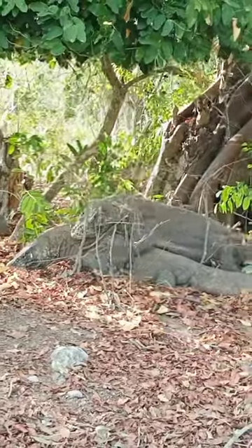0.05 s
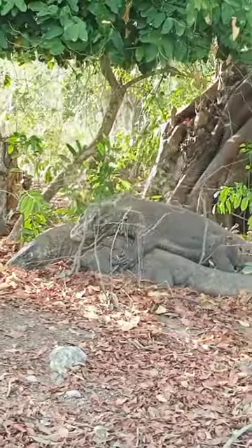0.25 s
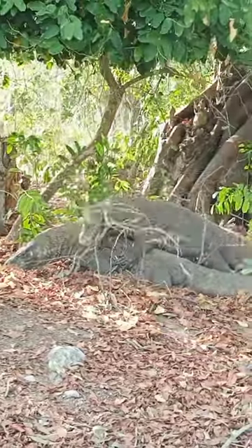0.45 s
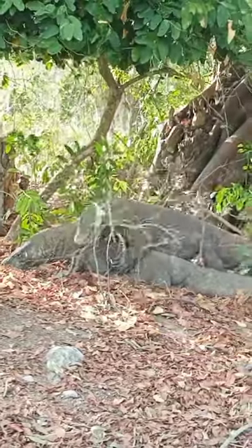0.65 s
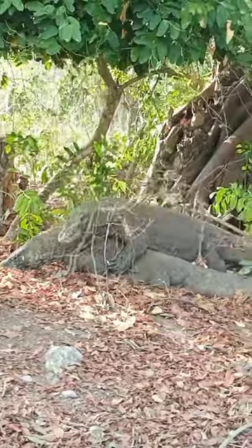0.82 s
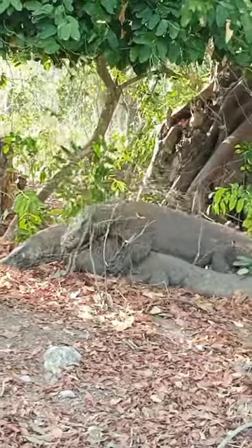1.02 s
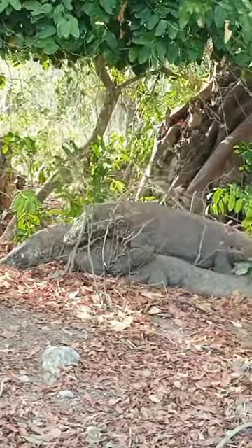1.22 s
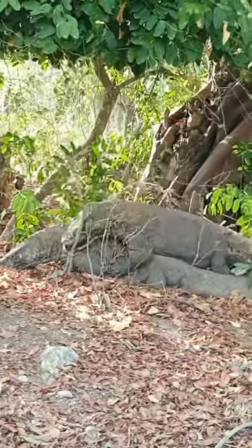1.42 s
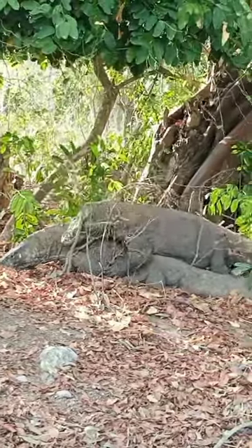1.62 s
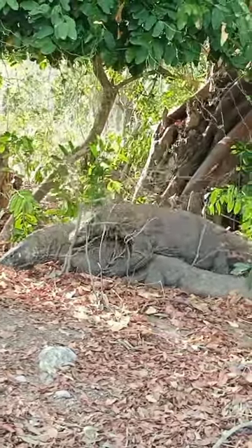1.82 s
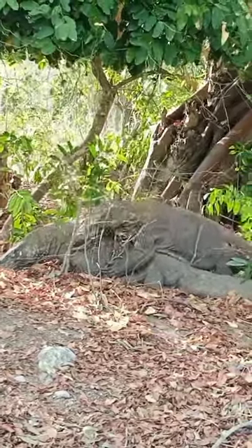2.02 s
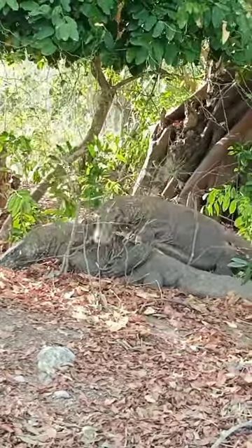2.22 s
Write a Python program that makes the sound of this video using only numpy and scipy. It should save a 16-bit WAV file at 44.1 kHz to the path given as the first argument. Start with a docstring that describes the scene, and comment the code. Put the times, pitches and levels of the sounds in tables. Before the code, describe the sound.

Large lizards drag over crackling dry leaves and twigs, with a faint engine chugging far off.

```python
"""Dry leaves rustle and crunch a few metres away, with sharp snaps and one dull thump.
Two large lizards are wrestling under trees: their bodies drag over the leaves and crush them,
twigs break and one body lands on the soil. Far off, a one-cylinder engine chugs, puffing
twenty times a second, and a few faint whistles, probably birds, pass over a soft outdoor hush."""
import sys
import numpy as np
from scipy import signal
from scipy.fft import rfft, irfft
from scipy.io import wavfile
from scipy.ndimage import uniform_filter1d

SR = 44100
rng = np.random.default_rng(int(sys.argv[2]) if len(sys.argv) > 2 else 0)


def to_wav(s):
    """Save 16-bit WAV."""
    ch = np.atleast_2d(s).T  # columns
    pcm = np.round(np.clip(ch, -1, 1) * 32767)  # PCM
    wavfile.write(sys.argv[1], SR, pcm.astype(np.int16))


N = 103635
TIME = np.arange(N) / SR

# the bright tone of brittle leaves and twigs breaking: f/Hz, level/dB
BREAK_SPECTRUM = [(100, -80), (500, -32), (1000, -25), (2000, -17), (3000, -10), (4000, -3), (4800, 1),
                  (5900, -2), (7400, 1), (8600, -2), (10300, -11), (12000, -11), (14500, -10), (15500, -16)]


def amp(db):
    """Turns decibels into a gain to multiply by."""
    return 10 ** (np.asarray(db) / 20)


def unit(x):
    """Scales a signal to an average power of 1."""
    return x / np.sqrt(np.mean(x ** 2) + 1e-20)


def add(mix, start_s, sound):
    """Mixes a sound in at the given time."""
    part = mix[max(round(start_s * SR), 0):][:len(sound)]
    part += sound[:len(part)]


def colour(x, spectrum, tilt_db=0, treble_hz=4500, size=4096):
    """Gives x a spectrum's shape, not its overall level, plus tilt_db per octave above treble_hz."""
    octaves = np.log2(np.fft.rfftfreq(size, 1 / SR) + 1)
    hz, db = np.transpose(spectrum)
    curve_db = np.maximum(np.interp(octaves, np.log2(hz), db), -90)
    curve_db += tilt_db * np.maximum(octaves - np.log2(treble_hz), 0)
    # build the filter so that it rings only after a click, never before
    cepstrum = irfft(np.log(amp(curve_db)))
    cepstrum[1:size // 2] *= 2
    cepstrum[size // 2 + 1:] = 0
    taps = irfft(np.exp(rfft(cepstrum)))
    return signal.fftconvolve(x, taps / np.linalg.norm(taps))[:len(x)]


def echoes(x, fade_s, size=12000):
    """Trunks and ground return a blur of echoes that falls 60 dB in fade_s."""
    t = np.arange(size) / SR
    taps = rng.standard_normal(size) * amp(-60 * t / fade_s) * (t > .002)
    return signal.fftconvolve(x, taps / np.linalg.norm(taps))[:len(x)]


def clicks(per_s, spread_db):
    """Tiny impacts at random times: many small, a few large."""
    strength = amp(spread_db * np.minimum(rng.exponential(1, N), 5))
    return unit(strength * rng.choice([-1, 1], N) * (rng.random(N) < per_s / SR))


def outdoor_air():
    """A soft, steady hush lies under everything."""
    # the tone of the hush: f/Hz, level/dB
    air_spectrum = [(20, -24), (50, -19), (90, -5), (150, 5), (300, -5), (470, -6.5), (700, -10),
                    (1200, -13.5), (2500, -18.5), (8000, -17), (15000, -14.5)]
    return amp(-69.5) * colour(rng.standard_normal(N), air_spectrum)


def leaf_rustle():
    """Scales slide over leaves in clumps of ticks; harder pushes add more crackle of breaking leaves."""
    # how hard the bodies drag, in five stretches joined into one curve: t/s, level/dB
    drag_stretches = [
        [(0.0, -57), (0.026, -63), (0.074, -55.5), (0.124, -59.5), (0.27, -52), (0.374, -56), (0.544, -45.5),
         (0.548, -45)],
        [(0.566, -41.5), (0.576, -42.5), (0.674, -40), (0.734, -44)],
        [(0.77, -46.5), (0.848, -46.5), (0.916, -50), (1.004, -50), (1.01, -48), (1.202, -50), (1.34, -56.5)],
        [(1.37, -56.5), (1.418, -61), (1.436, -57), (1.45, -61.5), (1.54, -62), (1.588, -54), (1.672, -58.5),
         (1.76, -62.5)],
        [(1.78, -61.5), (1.796, -57.5), (1.956, -50.5), (2.12, -56), (2.186, -61), (2.19, -64), (2.314, -61.5),
         (2.34, -64.5)],
    ]
    # the tone of dry leaves sliding: f/Hz, level/dB
    slide_spectrum = [(290, -43.5), (700, -33.5), (1400, -19.5), (2200, -20), (2700, -14.5), (3500, -6.5),
                      (4100, -1.5), (4900, 1), (5900, -1.5), (7300, 1), (8300, -2.5), (10100, -15),
                      (12000, -20), (14000, -21), (15500, -22)]
    drag_db = np.interp(TIME, *np.concatenate(drag_stretches).T)
    clump_samples = int(0.0046 * SR)
    flutter = uniform_filter1d(rng.standard_normal(N), clump_samples)
    clumps = amp(0.81 * unit(uniform_filter1d(flutter, clump_samples)))
    slide = clicks(per_s=14000, spread_db=2) * clumps * amp(drag_db + 0.75)
    hard_push_db, growth = -42, 1.134  # breaking grows faster than sliding
    break_db = hard_push_db - 6 + growth * (drag_db - hard_push_db)
    crackle = clicks(per_s=1500, spread_db=2.8) * clumps * amp(break_db)
    return colour(slide, slide_spectrum) + colour(crackle, BREAK_SPECTRUM)


def belly_rasp():
    """Heavy bellies grate over packed leaves and soil, making a duller rasp."""
    # how the grating swells and fades: t/s, level/dB
    rasp_levels = [(0.0, -79), (0.07, -70), (0.17, -70), (0.18, -66), (0.35, -67.5), (0.62, -52.5),
                   (0.99, -68.5), (1.04, -60.5), (1.51, -79.5), (1.61, -73.5), (1.72, -79), (1.98, -63.5),
                   (2.15, -74), (2.35, -81)]
    # the tone of the grating: f/Hz, level/dB
    rasp_spectrum = [(200, -30.5), (500, -17), (750, -8.5), (1050, -16), (1450, -4.5), (1750, -13.5),
                     (2050, -1), (2350, -6), (2750, 1.5), (3300, -6), (4500, -18), (8000, -39.5)]
    level_db = np.interp(TIME, *np.transpose(rasp_levels)) - 1.5
    return colour(clicks(per_s=5000, spread_db=2.5) * amp(level_db), rasp_spectrum)


def far_engine():
    """Each firing makes a puff, a rush of gas and a ring in the exhaust; the land adds echoes."""
    # the tone of one exhaust puff: f/Hz, level/dB
    puff_spectrum = [(25, -42), (50, -15), (75, -5.5), (115, 2), (160, -1.5), (230, 2), (340, -8),
                     (410, -8.5), (470, -0.5), (530, -17.5), (640, -33.5), (880, -14.5), (1300, -32),
                     (2500, -25)]
    # the tone of the gas rushing behind it: f/Hz, level/dB
    gas_spectrum = [(60, -31), (200, -7.5), (340, 1), (520, 10), (700, -3), (900, 1.5), (1300, -5.5),
                    (3000, -44.5)]
    # the notes the exhaust rings at: f/Hz, level/dB, time to fall 60 dB/s
    exhaust_notes = [(165, -77, .15), (468, -74, .085)]
    first_s, firing_hz, slowing_hz_per_s, gas_fade_s = .0242, 20.152, .092, 0.0072
    kicks, gas_flow, rings = np.zeros((3, N))
    t = np.arange(6000) / SR
    cycles = firing_hz * (TIME - first_s) - slowing_hz_per_s * TIME ** 2 / 2
    firing_times = TIME[1:][np.diff(np.floor(cycles)) > 0]
    for start_s in firing_times:
        force = amp(1.07 * rng.standard_normal())  # each firing differs by about 1 dB
        add(kicks, start_s, np.array([-force]))
        add(gas_flow, start_s, force * np.exp(-t / gas_fade_s))
        for hz, db, fade_s in exhaust_notes:
            ring_db = db + rng.standard_normal() - 60 * t / fade_s
            add(rings, start_s, -amp(ring_db) * np.sin(2 * np.pi * hz * t))
    puffs = amp(-38) * colour(kicks, puff_spectrum)
    gas = amp(-68.5) * colour(gas_flow * rng.standard_normal(N), gas_spectrum)
    chug = puffs + gas + rings
    return chug + amp(-10) * echoes(chug, fade_s=0.2)


def twig_snaps():
    """Fibres tear in a fast burst, then the shaken leaves settle."""
    # twigs and stiff leaves snapping: t/s, level/dB, treble tilt/dB per octave, tearing time/s
    snaps = [(0.4615, -44, -4, 0.0018), (0.5505, -26, -4, 0.0013), (0.7386, -18, 1, 0.00093),
             (0.7416, -38, 7, .0015), (0.829, -27, 7, .0004), (1.0079, -45, 0, 0.0017),
             (1.0367, -28, -12, 0.0005), (1.2463, -40, 3, 0.00056), (1.3497, -37, -4.5, 0.0013),
             (1.436, -50, -7, 0.00059), (1.5895, -48, -5, 0.0011), (1.602, -44, 4, .0007),
             (1.6085, -39, -3, .0008), (1.6785, -42.5, -8, 0.0016), (2.022, -43, -1, .0007),
             (2.1107, -51, -2, .003)]
    settle_db, settle_s = -14, .013
    out, t = np.zeros(N), np.arange(4000) / SR
    for start_s, db, tilt_db, tear_s in snaps:
        shape = np.exp(-t / tear_s) + amp(settle_db) * np.exp(-t / settle_s)
        burst = shape * rng.choice([-1, 1], len(t))
        add(out, start_s, .5 * amp(db) * colour(burst, BREAK_SPECTRUM, tilt_db))
    return out


def leaf_crush(start_s=.562, fade_s=0.19):
    """A lunge crushes a whole patch of leaves at once, in a bright, dense crunch."""
    shape = (TIME > start_s) * np.exp(-np.maximum(TIME - start_s, 0) / fade_s)
    crunch = clicks(per_s=6000, spread_db=2.8) * shape
    return amp(-43.5) * colour(crunch, BREAK_SPECTRUM, tilt_db=5)


def body_thump(start_s=.617, rise_s=0.0081, fade_s=0.06):
    """A heavy body lands on soft soil with a short, low thud."""
    # the tone of the thud: f/Hz, level/dB
    thump_spectrum = [(30, -43), (70, -10), (100, -9), (170, -3), (260, -14), (600, -29), (2000, -58)]
    t = np.maximum(TIME - start_s, 0)
    shape = np.minimum(t / rise_s, 1) * np.exp(-t / fade_s)
    return amp(-56) * shape * colour(rng.standard_normal(N), thump_spectrum)


def far_whistles():
    """Thin, gliding tones are blurred by the trees, so their echo is louder than they are."""
    # whistles, probably birds: t/s, length/s, start f/Hz, end f/Hz, level/dB
    calls = [(1.23, 0.18, 1760, 1710, -77), (1.31, 0.042, 1580, 1636, -64), (1.399, 0.055, 1036, 1020, -72),
             (1.401, 0.15, 1453, 1362, -73), (1.663, 0.021, 1630, 1480, -75),
             (1.893, 0.038, 1468, 1410, -61)]
    out = np.zeros(N)
    for start_s, length_s, start_hz, end_hz, db in calls:
        progress = np.linspace(0, 1, int(length_s * SR))
        waver = unit(uniform_filter1d(rng.standard_normal(N), size=200))[:len(progress)]
        hz = (start_hz + (end_hz - start_hz) * progress) * (1 + .02 * waver)
        tone = np.sin(2 * np.pi * np.cumsum(hz) / SR)
        add(out, start_s, amp(db) * np.sin(np.pi * progress) * tone)
    return amp(-9) * out + echoes(out, fade_s=.25)


def scene():
    """The lizards wrestle among trees over the far background, the same in both ears."""
    litter = leaf_rustle() + leaf_crush() + belly_rasp() + twig_snaps()
    echo_gain = amp(-10)
    near = litter + echo_gain * echoes(litter, fade_s=0.023)
    near /= np.hypot(1, echo_gain)  # keep the power as it was without echoes
    mix = near + outdoor_air() + body_thump() + far_engine() + far_whistles()
    return np.tile(mix, (2, 1))


def record(dry):
    """The recorder cuts off the very highest treble."""
    cutoff_hz = 15550
    low_pass = signal.firwin(511, cutoff_hz, window=("kaiser", 9), fs=SR)
    return signal.oaconvolve(dry, low_pass[None], "same")


dry = scene()
out = record(dry)
to_wav(out)
```